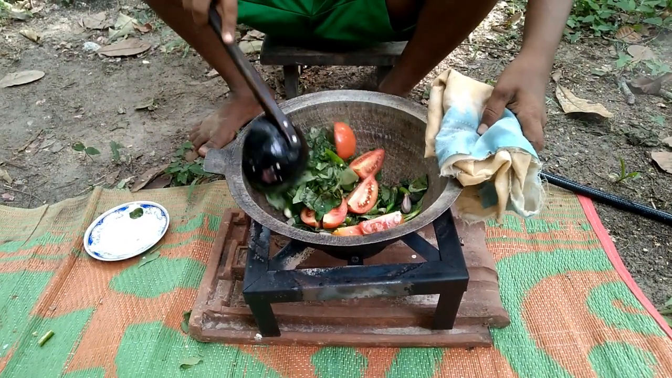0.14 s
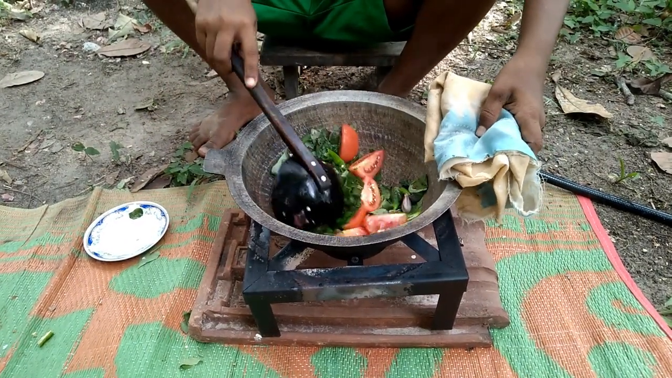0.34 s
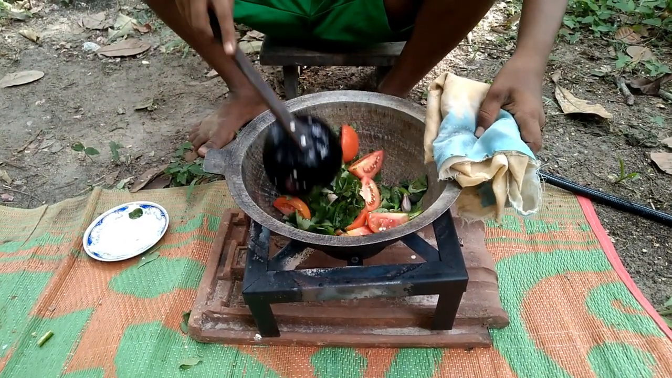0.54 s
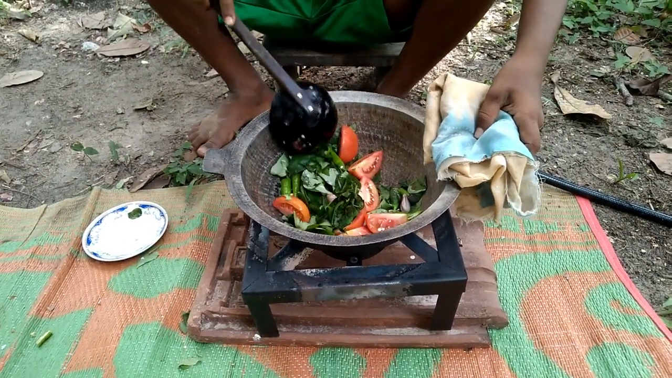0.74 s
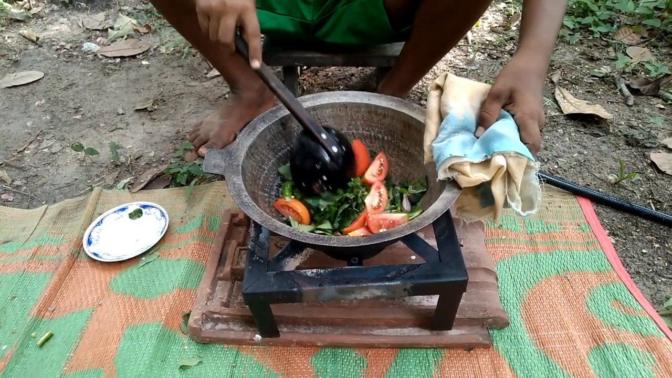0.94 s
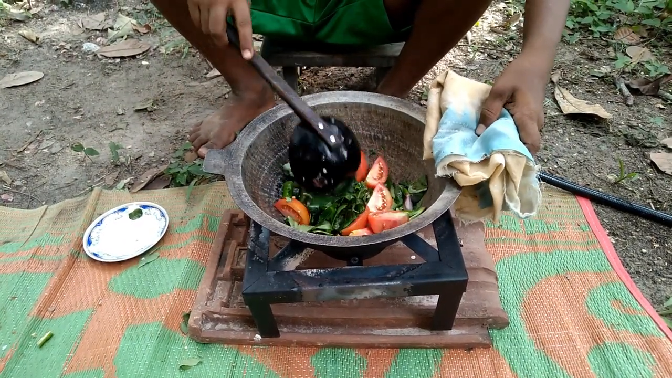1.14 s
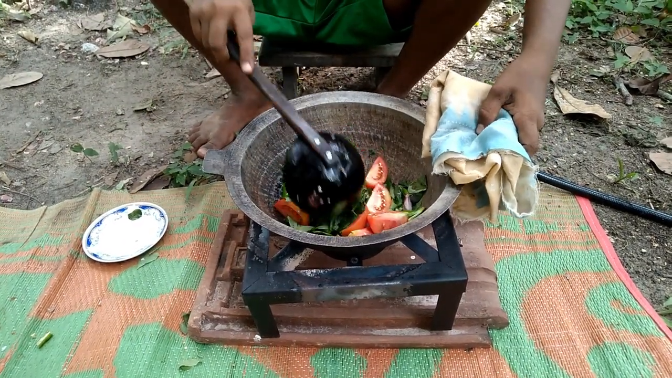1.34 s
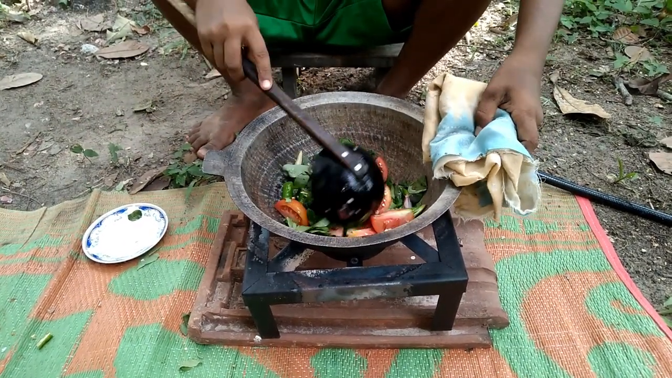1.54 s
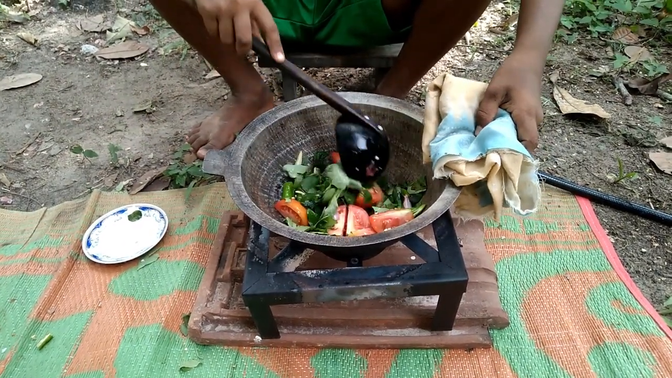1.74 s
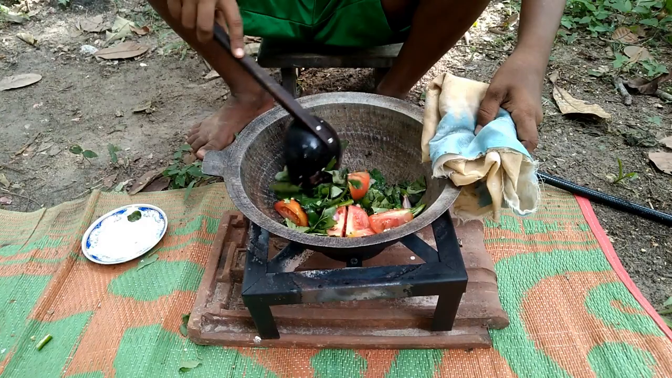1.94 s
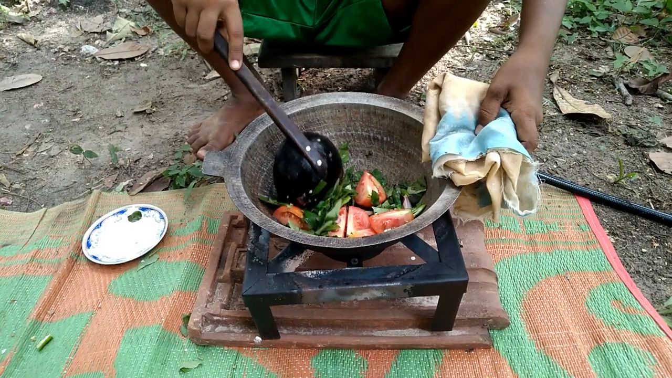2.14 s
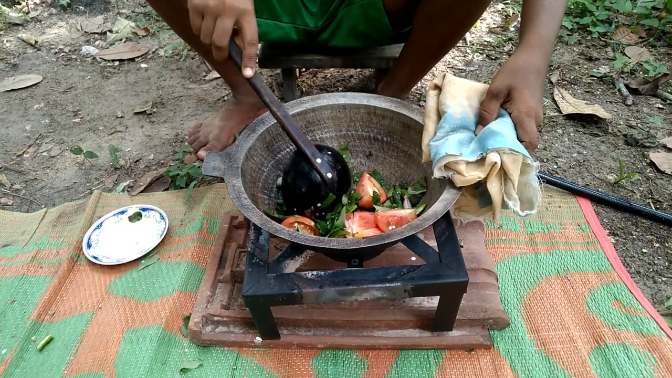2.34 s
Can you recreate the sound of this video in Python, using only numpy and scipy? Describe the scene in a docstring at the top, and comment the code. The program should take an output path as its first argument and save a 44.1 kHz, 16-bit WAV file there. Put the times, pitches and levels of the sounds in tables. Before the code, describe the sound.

A metal ladle clanks in a cast pan, rings on the rim, then bumps and scrapes through softly rustling vegetables. High crickets chirr steadily near and far in the open air.

```python
"""First comes a steady chorus of far crickets in the outdoor air, and a soft stir of wet leaves in a pan.
One near cricket chirps all along, two wing strokes to a chirp. A metal ladle stirs the leaves and
tomato pieces and knocks the cast pan twice, so that both ring. Then it jabs down through the
vegetables and scrapes along the bottom. The surroundings throw back a dull echo."""
import sys
import numpy as np
from scipy import signal
from scipy.fft import rfft, irfft
from scipy.io import wavfile

SR = 44100
rng = np.random.default_rng(int(sys.argv[2]) if len(sys.argv) > 2 else 0)


def wav_record(signal):
    """Record a signal, one row per channel, as 16-bit PCM in the file named by sys.argv[1]."""
    frames = np.transpose(np.atleast_2d(signal))
    bounded = np.clip(frames, -1, 1)
    # unit amplitude maps onto the largest positive 16-bit level
    quanta = np.round(bounded * 32767).astype(np.int16)
    wavfile.write(sys.argv[1], SR, quanta)


N = 105840
TIME, HZ = np.arange(N) / SR, np.fft.rfftfreq(N, 1 / SR)

# Levels in the tables are relative. A spectrum says how strong each pitch is.
# outdoor air and distant insects: pitch_hz, level_db
AIR_SPECTRUM = [(20, -21), (45, -4.5), (70, 5), (140, 6), (280, -14.5), (600, -11), (900, -4.5),
                (1300, -20), (2000, -2.5), (2800, -6.5), (3500, 2.5), (5400, 2), (5800, -7), (8500, -7),
                (10300, -20), (11400, -8.5), (12200, -25.5), (13200, -24), (15500, -32)]
# the far crickets together: pitch_hz, level_db
CHORUS_SPECTRUM = [(5000, -62), (5850, -44.5), (6150, -12.5), (6500, -4), (6900, 1), (7400, 3),
                   (7750, -3.5), (8150, -11), (8700, -36), (10500, -78.5)]
# how loudly the wet leaves settle: time_s, level_db
LEAF_LEVELS = [(0, -58.5), (.17, -69.5), (.25, -56), (.6, -65.5), (1.0, -59.5), (1.2, -77), (1.62, -77.5),
               (1.67, -63.5), (1.81, -66), (1.84, -56.5), (1.96, -57.5), (2.08, -73), (2.4, -103)]
# the fizz of the leaves: pitch_hz, level_db
LEAF_SPECTRUM = [(200, -35.5), (2000, -6.5), (5000, -3), (9000, 4), (11000, -11.5), (15500, -8)]
# the ladle dragging through the vegetables: start_s, length_s, level_db
LADLE_DRAGS = [(0, 0.08, -69.5), (0.22, 0.2, -71), (0.386, .2, -73.5), (0.883, 0.33, -71.5),
               (1.654, 0.2, -75), (1.827, 0.19, -61.5), (1.94, 0.018, -51), (1.955, 0.7, -73)]
# the rub of the ladle: pitch_hz, level_db
RUB_SPECTRUM = [(60, -29.5), (220, -13.5), (400, -15.5), (600, 5), (950, 0.5), (1300, -3), (1650, 0.5),
                (2300, -19), (4500, -26.5), (9000, -10.5), (15500, -30.5)]
# what the surroundings throw back: pitch_hz, level_db
ECHO_SPECTRUM = [(60, -16), (180, -7), (380, -1.5), (600, -14.5), (1000, -13), (1400, -26.5), (3000, -17),
                 (8000, -30), (15500, -41.5)]
# the near cricket's chirps: start_s, level_db
NEAR_CHIRPS = [(.020, -41.5), (0.102, -38.5), (0.185, -37), (.271, -39), (.352, -37.5), (0.432, -36),
               (0.513, -38.5), (0.595, -36.5), (0.676, -36), (0.758, -36.5), (0.838, -38.5), (0.933, -39.5),
               (1.018, -37), (1.097, -37.5), (1.18, -38.5), (1.257, -37), (1.338, -39), (1.416, -37.5),
               (1.498, -36.5), (1.576, -34.5), (1.658, -34.5), (1.739, -35.5), (1.82, -36.5),
               (1.901, -35.5), (1.982, -36), (2.063, -37.5), (2.144, -36.5), (2.225, -38), (2.308, -34.5),
               (2.391, -34.5)]
# ladle blows: start_s, ring_db, clack_db, rattle_db, place (0 low on the wall, 1 near the rim, 2 bottom)
LADLE_KNOCKS = [(0.2063, -.5, -5, -12.5, 0), (0.2344, -11, -16, -0.5, 0), (0.2579, -17, -23.5, 2.5, 0),
                (0.8173, 1, 2, -35.5, 1), (1.8270, -1.5, -5, -7, 2), (1.9502, -10, -22.5, -7.5, 2)]
# the ringing tones of the pan on its stand and of the ladle that strikes it, by place struck:
# pitch_hz, fade_s (time to drop by 60 dB), wall_db, rim_db, bottom_db
KNOCK_TONES = [(388, .3, -60, -80, -57), (945, .44, -39, -34, -52), (1011, .24, -32, -52, -62),
               (1150, .18, -39, -62, -80), (1205, .13, -35, -56, -66), (1820, .43, -34, -38, -59),
               (1862, .22, -28.5, -28, -58), (2850, .19, -26, -45, -50), (2925, .16, -27, -49, -64),
               (2955, .14, -28, -54, -64), (3026, .18, -36, -56, -69), (3149, .3, -62, -46, -75),
               (3262, .3, -51, -40, -75), (3390, .38, -45, -47, -68), (3412, .38, -56, -40, -69),
               (3553, .34, -44, -37.5, -69), (4087, .15, -37, -50, -66), (4110, .19, -34, -46, -64),
               (4220, .2, -32, -37, -62), (4500, .08, -39, -50, -62), (5055, .13, -44, -68, -65),
               (5674, .07, -39, -56, -60)]
# the short clack of ladle on pan, by place struck: pitch_hz, wall_db, rim_db, bottom_db
CLACK_SPECTRA = [(60.4, -24.5, -48, -25), (169, -17, -27, -5.5), (270, -11.5, -27, -3),
                 (480, -6.5, -14, -11.5), (837, -4.5, -9.5, -4), (936, -5.5, -11.5, -9),
                 (1178, 9, 8.5, -8.5), (1420, -12.5, 10.5, -16), (1584, 4, -3, -1.5),
                 (1930, -17.5, -8, -11), (2330, 2.5, -1.5, -30), (2700, -12, -12, -26),
                 (3033, -6, -2.5, -19.5), (4323, 3.5, -10.5, -17.5), (8230, -3.5, -20, -1),
                 (11190, -33, -37.5, -21.5), (15500, -45, -44.5, -30)]
# the loudness of the ladle's own thin ring: time_s, level_db
LADLE_RING_LEVELS = [(.208, -40.5), (.3, -60.5), (.41, -57), (.5, -59), (.7, -78), (.9, -66), (1.2, -110)]
# the ladle catching lightly on the pan: start_s, level_db
LADLE_CATCHES = [(1.709, -28), (1.839, -16), (2.226, -31), (2.262, -39), (2.329, -33)]

PITCH_FALL_HZ_PER_S = 95000  # every wing stroke slides down this fast


def amp(db):
    """Turns decibels into a number to multiply by."""
    return 10 ** (np.asarray(db) / 20)


def unit(x):
    """Scales a sound to an average power of 1."""
    return x / np.sqrt(np.mean(x ** 2) + 1e-20)


def gain_at(spectrum, hz):
    """Reads a spectrum between its rows, as a number to multiply by."""
    row_hz, db = np.transpose(spectrum)
    return amp(np.interp(np.log(hz + 1), np.log(row_hz + 1), db))


def colour(x, spectrum):
    """Shapes a sound with a spectrum, at an average power of 1."""
    return unit(irfft(rfft(x) * gain_at(spectrum, HZ), N))


def add(mix, start_s, sound):
    """Mixes a sound in at a time."""
    at = max(round(start_s * SR), 0)
    part = mix[at:at + len(sound)]
    part += sound[:len(part)]


def click(spectrum, size=4096):
    """A click with a sudden start and the given spectrum."""
    log_gain = np.log(gain_at(spectrum, abs(np.fft.fftfreq(size, 1 / SR))))
    response = np.exp(np.conj(signal.hilbert(log_gain)))  # packs the energy at the start
    return np.fft.ifft(response).real[:size // 2]


def scatter(fade_s, size=22050):
    """A dying run of random taps with a total energy of 1."""
    taps = rng.choice([-1., 1.], size) * amp(-60 * TIME[:size] / fade_s)
    return taps / np.linalg.norm(taps)


def grains(per_s, spread_db):
    """Random tiny clicks of uneven size."""
    sizes = amp(spread_db * np.minimum(rng.exponential(1, N), 4))
    return unit(rng.standard_normal(N) * sizes * (rng.random(N) < per_s / SR))


def outdoor_air(level_db=-68):
    """Air and distant insects blend into a steady hush."""
    return amp(level_db) * colour(rng.standard_normal(N), AIR_SPECTRUM)


def far_crickets(level_db=-49.5, strokes_per_s=700, start_hz=8800, blur=0.36):
    """Many falling wing strokes overlap, blurred by distance."""
    t = TIME[:SR // 30]
    cycles = np.cumsum(start_hz - PITCH_FALL_HZ_PER_S * t) / SR
    stroke = np.sin(2 * np.pi * cycles) * signal.windows.tukey(len(t), .1)
    triggers = 1. * (rng.random(N) < strokes_per_s / SR)
    chorus = unit(signal.fftconvolve(triggers, stroke, "same"))
    return amp(level_db) * colour(chorus + blur * rng.standard_normal(N), CHORUS_SPECTRUM)


def leaves():
    """Stirred wet leaves settle with a fine crackle."""
    loudness = amp(np.interp(TIME, *np.transpose(LEAF_LEVELS)))
    return loudness * colour(grains(per_s=7000, spread_db=2.5), LEAF_SPECTRUM)


def ladle_drags():
    """The ladle rubs through the food: a gritty sound that swells and fades with each push."""
    pressure = np.zeros(N)
    for start_s, length_s, db in LADLE_DRAGS:
        t = np.arange(0, length_s, 1 / SR)
        add(pressure, start_s, amp(db) * np.sin(np.pi * t / length_s))
    return pressure * colour(grains(per_s=1500, spread_db=1), RUB_SPECTRUM)


def echo(sound, fade_s=.4, build_s=.0087):
    """The surroundings throw back many small reflections that blur into a dull tail."""
    tail = scatter(fade_s)
    tail *= 1 - np.exp(-TIME[:len(tail)] / build_s)
    dull_tail = signal.fftconvolve(tail, click(ECHO_SPECTRUM))
    return signal.fftconvolve(sound, dull_tail)[:N]


def wing_stroke(lead_s, pitch_hz=7460, swell_s=.002, tail_s=.0016, upper_ratio=1.53, upper_db=-31):
    """One stroke of the wings falls in pitch: a strong swell at lead_s, then a weaker, lower tail."""
    t = TIME[:SR // 40] - lead_s
    stroke_hz = rng.normal(pitch_hz, 35)  # no two strokes are quite alike
    tail_db, tail_at_s, tail_shift = rng.normal(-5, 3.5), rng.normal(.005, .0005), rng.normal(0, np.pi)
    phase = 2 * np.pi * np.cumsum(stroke_hz - PITCH_FALL_HZ_PER_S * t) / SR
    upper_tone = amp(upper_db) * np.sin(upper_ratio * phase)  # a faint, higher wing vibration
    swell = np.exp(-(t / swell_s) ** 2) * (np.sin(phase) + upper_tone)
    tail = amp(tail_db) * np.exp(-((t - tail_at_s) / tail_s) ** 2) * np.sin(phase + tail_shift)
    return swell + tail


def near_cricket(gain_db=-0.8, gap_s=.0225, second_db=0.67, lead_s=.01, yard_db=-10):
    """Two wing strokes make each chirp, and the yard scatters the sound."""
    chirps = np.zeros(N)
    for start_s, db in NEAR_CHIRPS:
        add(chirps, start_s - lead_s, amp(db) * wing_stroke(lead_s))
        add(chirps, start_s - lead_s + gap_s, amp(db + second_db) * wing_stroke(lead_s))
    yard = amp(yard_db) * signal.fftconvolve(chirps, scatter(fade_s=.076))[:N]
    return amp(gain_db) * (chirps + yard)


def knock_ring(ring_db, place, rise_s=.001):
    """Pan and ladle ring with many fading tones; the place hit sets how strong each is."""
    t = TIME[:SR]
    ring = np.zeros(SR)
    for hz, fade_s, *place_db in KNOCK_TONES:
        loudness = amp(ring_db + place_db[place] - 60 * t / fade_s)
        ring += loudness * np.sin(2 * np.pi * (hz * t + rng.random()))
    return ring * (1 - np.exp(-t / rise_s))


def clack(rattle_db, place):
    """Ladle meets pan in a burst of tiny contacts and a brief rattle."""
    contacts = .8 * scatter(fade_s=.011) + .55 * scatter(fade_s=.028)
    contacts += amp(rattle_db) * scatter(fade_s=.14)
    contacts[0] += .2  # the very first touch
    spectrum = [(hz, place_db[place]) for hz, *place_db in CLACK_SPECTRA]
    return signal.fftconvolve(contacts, click(spectrum))


def ladle_knocks(clack_boost_db=10):
    """Each blow makes a clack and sets pan and ladle ringing."""
    knocks = np.zeros(N)
    for start_s, ring_db, clack_db, rattle_db, place in LADLE_KNOCKS:
        add(knocks, start_s, knock_ring(ring_db, place))
        add(knocks, start_s, amp(clack_db + clack_boost_db) * clack(rattle_db, place))
    return knocks


def ladle_ring(pitch_hz=2462):
    """One thin tone of the ladle's bowl lingers, and grows again as it comes free of the food."""
    level_db = np.interp(TIME, *np.transpose(LADLE_RING_LEVELS), left=-np.inf)
    return amp(level_db) * np.sin(2 * np.pi * pitch_hz * TIME)


def ladle_catches(fade_s=.065):
    """The ladle catches lightly on the pan, each time with a short scratch."""
    catches = np.zeros(N)
    for start_s, db in LADLE_CATCHES:
        add(catches, start_s, amp(db) * signal.fftconvolve(scatter(fade_s), click(RUB_SPECTRUM)))
    return catches


def scene():
    """Air, crickets and cooking, mixed into one channel."""
    air = outdoor_air()
    ladle = ladle_knocks() + ladle_catches() + ladle_drags() + ladle_ring()
    crickets = near_cricket() + far_crickets()
    return (air + crickets + ladle + echo(ladle) + leaves())[None]


def record(dry, cutoff_hz=16000):
    """Takes away the very highest treble."""
    low_pass = signal.firwin(511, cutoff_hz, window=("kaiser", 9), fs=SR)
    return signal.oaconvolve(dry, low_pass[None], "same")


dry = scene()
out = record(dry)
wav_record(out)
```